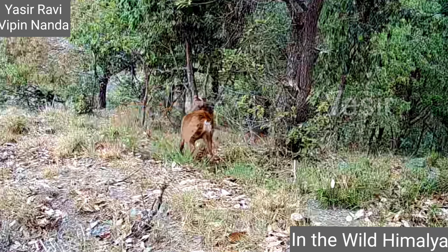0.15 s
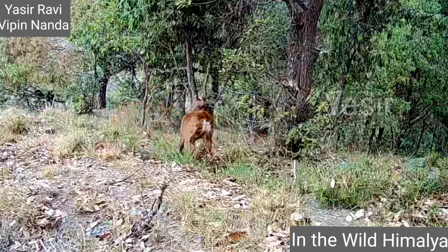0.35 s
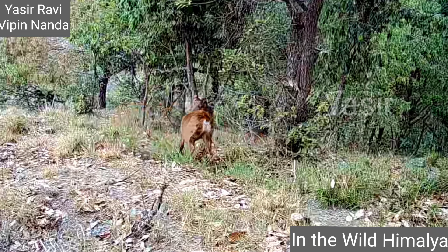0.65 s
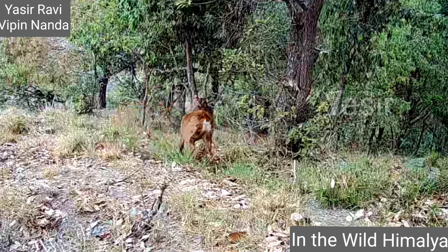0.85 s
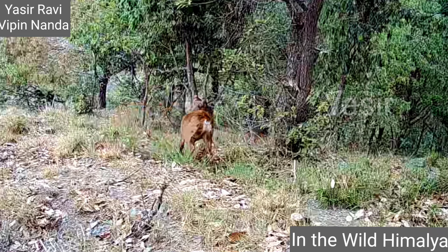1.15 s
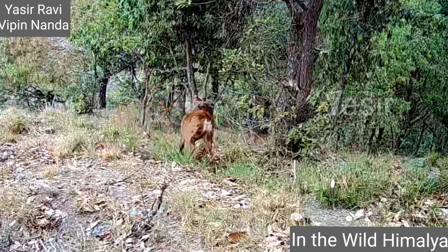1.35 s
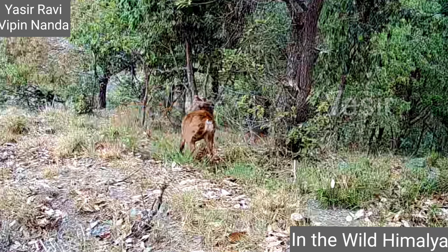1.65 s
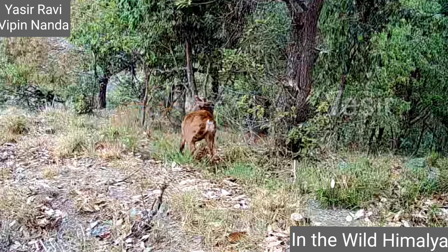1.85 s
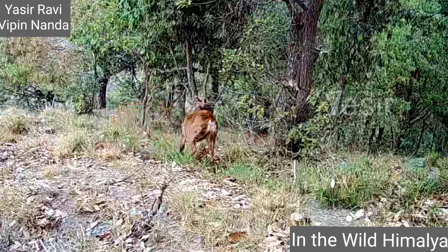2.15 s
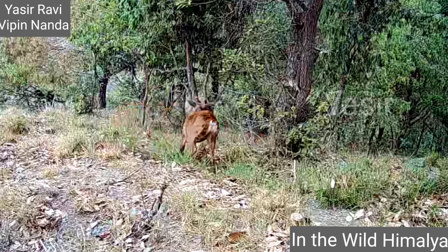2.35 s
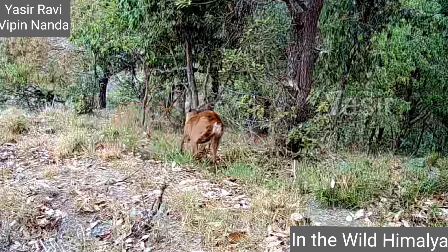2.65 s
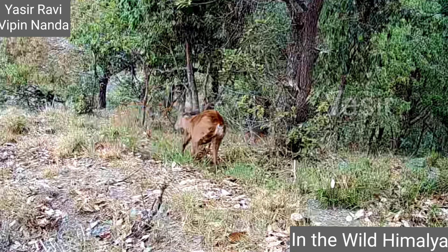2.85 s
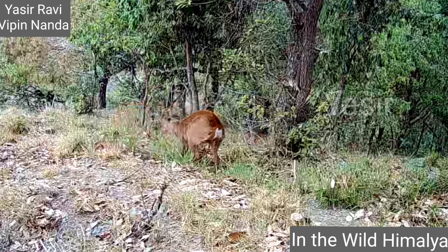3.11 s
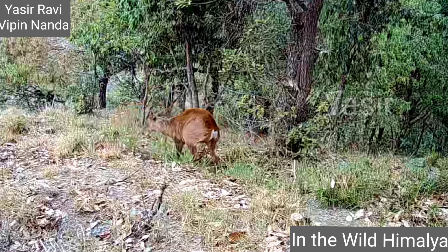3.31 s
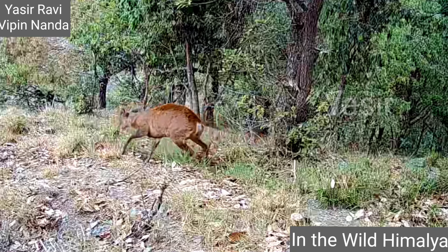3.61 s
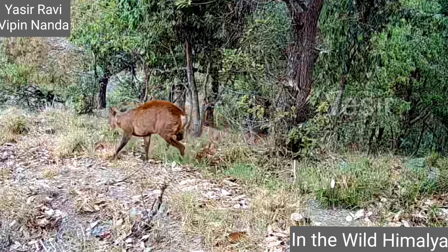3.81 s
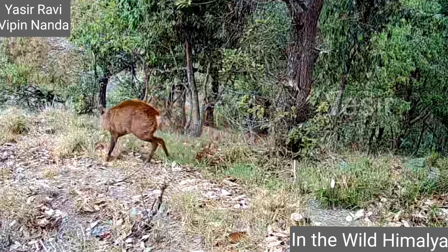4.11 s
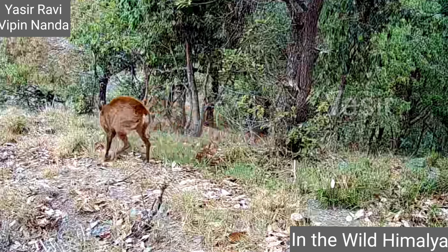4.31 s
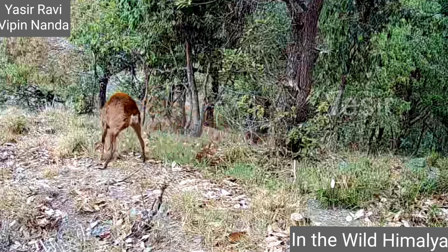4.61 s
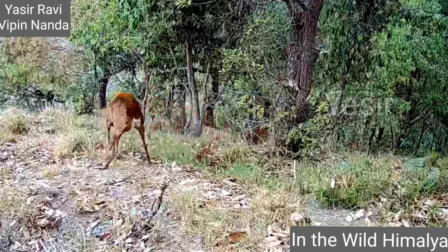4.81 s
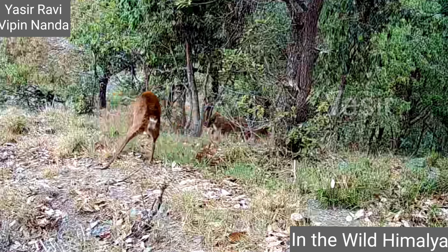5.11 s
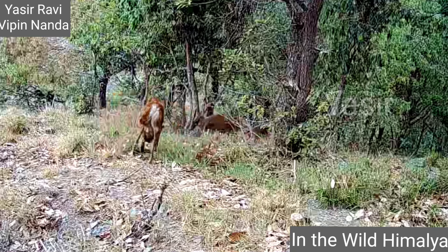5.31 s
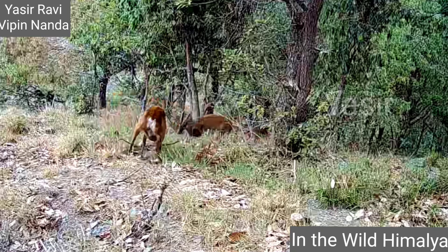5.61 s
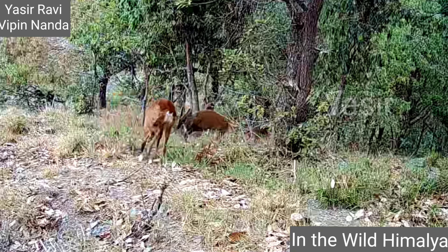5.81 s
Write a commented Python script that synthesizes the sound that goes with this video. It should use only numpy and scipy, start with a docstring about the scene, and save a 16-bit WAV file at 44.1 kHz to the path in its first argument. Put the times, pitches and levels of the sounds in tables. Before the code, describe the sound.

Two deer call briefly from nearby, their piercing voices lightly echoing off trees. First comes a falling clear squeal, then a raspy arched one. Leaves tick and rustle gently around the middle, thin far squeals and chirps fade out, and a stronger clear call sounds. Near the end a hoarse call is closely followed by a clear one. Airy foliage hiss runs throughout, captured outdoors in stereo with thin low end.

```python
"""Two deer squeal in a quiet forest, over a soft hiss that eases a little in the first four seconds.
Faint squeals (bare harmonics) and chirps (gliding sines) among the trees and ticking leaves (noise bursts) open it.
A clear, mostly falling voice calls first, then a hoarse, quavering arch: both are harmonics shaped by a throat.
At about 2.5 s the grainy leaf rustle swells as the deer turns to walk off; the distant calls end before 3.5 s.
The clear deer calls again, then near the end the hoarse one and the clear one follow each other closely."""
import sys
import numpy as np
from scipy import signal
from scipy.fft import rfft, irfft, next_fast_len
from scipy.io import wavfile
from scipy.ndimage import map_coordinates

SR = 44100
rng = np.random.default_rng(int(sys.argv[2]) if len(sys.argv) > 2 else 0)


def inscribe(sig):
    """Save sig as 16-bit PCM at rate SR to the path in sys.argv[1].

    A 1-D sig is mono; a 2-D sig holds one channel per row.
    Samples are clipped to [-1, 1] before scaling.
    """
    pcm = np.round(np.clip(np.atleast_2d(sig).T, -1, 1) * 32767)
    wavfile.write(sys.argv[1], SR, pcm.astype(np.int16))


N = 262836
TIME = np.arange(N) / SR
TOP_HZ = 15800  # upper band limit

# Held part of each clear call: (time [s], pitch [Hz], level before harmonic balance and echoes [dB])
CLEAR_CALLS = [
    [(0.35, 1236, -37), (0.368, 1238, -37), (0.402, 1211, -42.5), (0.442, 1176, -38), (0.536, 1167, -38.5),
     (0.645, 1117, -45.5)],
    [(3.282, 1241, -30), (3.318, 1230, -25), (3.344, 1208, -30.5), (3.428, 1174, -28), (3.516, 1158, -32.5),
     (3.585, 1117, -38.5)],
    [(5.548, 1286, -31.5), (5.622, 1302, -26), (5.742, 1250, -28), (5.774, 1218, -27.5),
     (5.846, 1180, -30.5), (5.868, 1163, -34.5)],
]
# Held part of each hoarse call: (time [s], pitch [Hz], level before harmonic balance and echoes [dB])
HOARSE_CALLS = [
    [(1.168, 1230, -37), (1.21, 1303, -31.5), (1.346, 1334, -31), (1.45, 1309, -31), (1.634, 1146, -43.5),
     (1.65, 1164, -41)],
    [(5.068, 1213, -36.5), (5.1, 1273, -32), (5.22, 1321, -28), (5.318, 1301, -29.5), (5.464, 1215, -37),
     (5.5, 1161, -37)],
]
# Voicing of each call: (upward scoop [s], final drop [s], drop [share of pitch], treble slope [dB per octave],
# 2nd, 3rd, 4th and upper harmonics [dB against the call's level])
CLEAR_VOICING = [(.052, 0.032, 0.29, -5.5, -0.5, -10.5, -1, -13.5),
                 (.048, 0.033, .15, 2, -7, -9.5, -5.5, -11), (.048, 0.019, .176, 2.5, -6, -8.5, -6, -13.5)]
HOARSE_VOICING = [(.052, .023, 0.084, 0, -4.5, -11.5, -13, -4.5),
                  (.052, .068, 0.059, 0.0057, -6, -12, -12, -5)]
# Gain as the pitch is pushed up: (2nd, 3rd, 4th, upper harmonics [dB per semitone])
CLEAR_PUSH = [(1.5, -0.17, -3.5, -3), (0, -1.4, 1.5, -1), (0.5, -2, 4, -1.5)]
HOARSE_PUSH = [(1, -5, 0.5, 0.63), (0.3, -8, 2.6, 0.37)]
# Upper resonances of the two throats: (frequency [Hz], relative level [dB])
CLEAR_THROAT = [(5600, -2.5), (6300, 1.5), (7200, -13), (8100, 4.5), (8900, -1.5), (9800, -20.5),
                (10600, -12), (11200, -20), (11800, -16.5), (13000, -14), (14200, -25), (15700, -30.5)]
HOARSE_THROAT = [(5600, -5), (6600, -5), (7400, -1), (7950, 4), (8600, -14), (9400, -22.5), (10600, -22),
                 (12000, -20), (13300, -28), (15700, -46)]
# Strain in each hoarse call: (period doubling [dB], rasp [dB])
HOARSE_STRAIN = [(-21, -27), (-22.5, -33)]
# Colour of the lines halfway between the harmonics: (frequency [Hz], relative level [dB])
HALFWAY_COLOUR = [(1900, -22.5), (2500, 7.5), (3200, -1), (4600, -6), (6000, 2.5), (7300, -2), (8600, -6),
                  (10000, -6), (11200, -18.5), (12500, -11), (15500, -27)]
# Spells of harsh noise inside the calls: (time [s], length [s], centre [Hz], level before fades and echoes [dB])
HARSH_BREAKS = [(1.368, 0.077, 3540, -50.5), (1.563, 0.18, 3140, -55), (5.424, 0.18, 3220, -50.5),
                (5.683, 0.15, 3130, -54.5)]
# Distant squeals: (time [s], length [s], top pitch [Hz], arch depth [twice the share of pitch lost at each end],
# level before fades and echoes [dB])
FAR_CALLS = [(0.058, 0.13, 1471, 0.41, -60), (0.897, 0.19, 1563, 0.25, -60.5),
             (1.773, 0.12, 1282, 0.51, -59.5), (3.175, 0.021, 1300, 0.11, -61.5)]
# Colour of the distant voices: (frequency [Hz], relative level [dB])
FAR_THROAT = [(1500, -13.5), (3000, -3.5), (3700, -1), (4500, 3.5), (6200, -17.5), (8000, -38)]
# Short chirps: (time [s], length [s], start pitch [Hz], end pitch [Hz], level before fades and echoes [dB])
CHIRPS = [(0.108, 0.057, 2722, 2507, -51.5), (1.415, 0.039, 2800, 3130, -52.5),
          (1.605, 0.032, 2864, 2626, -48), (2.01, 0.037, 3300, 3440, -68),
          (3.152, 0.015, 2660, 3070, -55.5), (3.168, 0.055, 2583, 2395, -52.5),
          (3.202, 0.034, 2584, 2663, -56), (3.361, 0.015, 2690, 2710, -50)]
# Dry leaves under hooves: (time [s], relative level of the burst [dB])
LEAF_TICKS = [(0.1474, -48.5), (2.2878, -51), (2.4136, -50), (2.624, -50.5), (2.744, -52.5),
              (2.8125, -53.5), (2.952, -54), (3.692, -49.5), (4.3384, -59.5)]
# Colour of the leaf noise: (frequency [Hz], gain [dB])
LEAF_COLOUR = [(1000, -12), (2200, 15), (4500, -2), (9000, 1.5), (15000, -12.5)]
# Spectrum of the hiss: (frequency [Hz], relative level [dB per Hz])
AIR_COLOUR = [(25, -49), (300, -44), (500, -34), (630, -26.5), (800, -20.5), (1000, -14.5), (1400, -7),
              (2000, 0.5), (2600, -4), (3500, -7.5), (5000, -13), (8000, -15), (12000, -17), (15500, -18)]
# Likeness of the hiss left and right: (frequency [Hz], correlation [0 to 1])
AIR_LIKENESS = [(300, .4), (1000, 0.76), (2000, 0.64), (4000, 0.13), (7000, 0.91), (14000, 1)]
# Ring of the wood beyond: (frequency [Hz], time to fall 60 dB [s])
FOREST_RING = [(1000, 0.35), (4000, 0.8), (8000, 0.53), (15000, 0.13)]
# Colour of the echoes: (frequency [Hz], gain [dB])
ECHO_COLOUR = [(1500, -1.5), (3000, -0.5), (4700, 2), (6000, 5), (8000, 0.5), (15000, -6.5)]


def squeal(rows, voicing, push_db, throat, quaver, quaver_hz, jitter, half_db, first_db,
           rasp_db, onset_rasp_db, onset_db, release_db, flicker_db):
    """One call: the folds start harshly, scoop up to pitch, hold, then slacken."""
    scoop_s, drop_s, drop, treble_db, *balance_db = voicing
    start, end = rows[0][0], rows[-1][0]
    span, t = during(start - scoop_s, end + drop_s)
    held, level_db = curves(rows, t)

    # all harmonics follow the level; their balance tips with the pitch
    semitones = 12 * np.log2(held / held.mean())
    second, third, fourth, upper = [
        level_db + db + push * semitones for db, push in zip(balance_db, push_db)]

    # rise goes 1 to 0 over the scoop, fall 0 to 1 over the drop
    rise = np.clip((start - t) / scoop_s, 0, 1)
    fall = np.clip((t - end) / drop_s, 0, 1)
    bend = (1 - 0.52 * rise ** 1.7) * (1 - drop * fall ** 2.5)
    quavering = quaver * unit(np.gradient(wobble(quaver_hz, t)))
    pitch = held * bend * (1 + quavering + jitter * wobble(900, t))
    phase = 2 * np.pi * np.cumsum(pitch) / SR

    # the throat keeps its shape while the bending harmonics slide through it
    orders = np.arange(5, 15)[:, None]
    high = amp(along(throat, orders * held) + treble_db * np.log2(orders))
    high_db = 20 * np.log10(high / np.linalg.norm(high, axis=0))
    shape = np.vstack([second + first_db, second, third, fourth, upper + high_db])

    # harshest at the onset, with some of it back in the final drop
    rasp = amp(rasp_db) + amp(onset_rasp_db) * np.maximum(rise, fall / 2) ** 2
    voice = np.zeros(len(t))
    for k in range(1, 20):
        size = amp(map_coordinates(shape, [k * bend - 1, np.arange(len(t))], order=1, mode="nearest"))
        # higher harmonics waver more in strength
        flicker = flicker_db * np.sqrt(k / 4) * (wobble(69.9, t) + wobble(16.93, t))
        line = amp(flicker) * np.sin(k * phase)
        # turbulence spreads a skirt of noise round each harmonic
        skirt = wobble(800, t) * np.sin(k * phase) + wobble(800, t) * np.cos(k * phase)
        # unequal alternate cycles put lines halfway between the harmonics
        between_db = upper + half_db + along(HALFWAY_COLOUR, (k + .5) * pitch) + 1.2 * wobble(50, t)
        halfway = amp(between_db) * np.sin((k + .5) * phase)
        voice += (size * (line + rasp * skirt) + halfway) * (k * pitch < TOP_HZ)

    edges = amp(onset_db * rise + release_db * fall) * np.sqrt(1 - np.maximum(rise, fall) ** 6)
    out = np.zeros(N)
    out[span] = np.sqrt(2) * voice * edges
    return out


def clear_deer():
    """A pure, piercing voice: little quaver, and only faint lines between its harmonics."""
    return sum(
        squeal(rows, voicing, push_db, CLEAR_THROAT, quaver=0.0011, quaver_hz=50.6, jitter=0.0035,
               half_db=-37, first_db=-42.5, rasp_db=-45, onset_rasp_db=-4,
               onset_db=-13, release_db=-6.5, flicker_db=1.5)
        for rows, voicing, push_db in zip(CLEAR_CALLS, CLEAR_VOICING, CLEAR_PUSH))


def hoarse_deer():
    """A strained voice that quavers and doubles its period."""
    return sum(
        squeal(rows, voicing, push_db, HOARSE_THROAT, quaver=0.0049, quaver_hz=149.64, jitter=0.003,
               half_db=half_db, first_db=-36.5, rasp_db=rasp_db, onset_rasp_db=-1,
               onset_db=-11.5, release_db=-4.0, flicker_db=1.13)
        for rows, voicing, push_db, (half_db, rasp_db)
        in zip(HOARSE_CALLS, HOARSE_VOICING, HOARSE_PUSH, HOARSE_STRAIN))


def breaks(width_hz=700, flutter_db=4):
    """The voice turns briefly harsh: fluttering bands of noise between its low harmonics."""
    out = np.zeros(N)
    for s, length, centre_hz, db in HARSH_BREAKS:
        span, t = during(s, s + length)
        band = (wobble(width_hz, t) + 1j * wobble(width_hz, t)) * np.exp(2j * np.pi * centre_hz * t)
        harsh = unit(band.real * amp(flutter_db * wobble(120, t)))
        out[span] += amp(db) * harsh * np.sin(np.pi * (t - s) / length)
    return out


def far_calls():
    """Thin, ragged squeals from deeper in the wood: harmonics 2 to 5 on an arched pitch."""
    out = np.zeros(N)
    for s, length, top_hz, arch, db in FAR_CALLS:
        span, t = during(s, s + length)
        u = np.clip((t - s) / length, 0, 1)
        pitch = top_hz * (1 - 2 * arch * (u - .5) ** 2 + .018 * wobble(900, t))
        phase = 2 * np.pi * np.cumsum(pitch) / SR
        voice = sum(amp(along(FAR_THROAT, k * pitch) + 3.6 * wobble(88.7, t)) * np.sin(k * phase)
                    for k in range(2, 6))
        out[span] += amp(db) * unit(voice) * np.abs(np.sin(np.pi * u)) ** .5
    return out


def chirps():
    """Brief, unsteady whistles: single sines gliding between two pitches."""
    out = np.zeros(N)
    for s, length, from_hz, to_hz, db in CHIRPS:
        span, t = during(s, s + length)
        u = (t - s) / length
        pitch = (from_hz + (to_hz - from_hz) * u) * (1 + 0.026 * wobble(300, t))
        whistle = np.sqrt(2) * np.sin(2 * np.pi * np.cumsum(pitch) / SR)
        out[span] += amp(db) * np.sin(np.pi * u) * whistle
    return out


def leaves(t60=0.021, level_db=-3, crackle_db=8):
    """Dry leaves snap in short, decaying noise bursts over a faint, grainy rustle."""
    # the rustle swells as the deer turns to walk off; levels are ahead of the leaf colour
    quiet_db, turn_db, turn_s, turn_width_s = -83, 12.5, 2.55, .5
    rustle_db = quiet_db + turn_db * np.exp(-((TIME - turn_s) / turn_width_s) ** 2)
    grains = amp(crackle_db * np.tanh(wobble(150, TIME))) * rng.standard_normal(N)
    out = unit(grains) * amp(rustle_db)
    for s, db in LEAF_TICKS:
        span, t = during(s, s + .08)
        burst_db = db + level_db - 60 * (t - s) / t60 + 4.4 * wobble(530, t)
        out[span] += amp(burst_db) * rng.standard_normal(len(t))
    return filtered(out, lambda hz: amp(along(LEAF_COLOUR, hz)))


def air():
    """Soft hiss of foliage: coloured mid and side noise, widest around 4 kHz."""
    def colour(hz):
        # this angle between mid and side gives the wanted left-right correlation
        turn = np.arccos(np.clip(along(AIR_LIKENESS, hz), -1, 1)) / 2
        return amp(along(AIR_COLOUR, hz)) * [np.cos(turn), np.sin(turn)]

    mid, side = filtered(rng.standard_normal((2, N)), colour)
    # the hiss eases a little at first, then holds
    steady_db, early_db, settle_s = -61.5, 3, 4
    level_db = steady_db + early_db * np.maximum(1 - TIME / settle_s, 0)
    return unit(np.array([mid + side, mid - side])) * amp(level_db + 0.37 * wobble(7.8, TIME))


def forest(x, near_db, far_db, near_t60=0.14):
    """Ground and near trunks scatter the sound at once; the wood beyond rings on faintly."""
    hz, t, z = signal.stft(rng.standard_normal((2, SR)), SR, nperseg=256)
    ring = amp(-60 * t / along(FOREST_RING, hz)[:, None])
    far = signal.istft(z * ring, SR, nperseg=256)[1][:, :SR]
    near = rng.standard_normal((2, SR)) * amp(-60 * TIME[:SR] / near_t60)
    echo = (amp(near_db) * unit(near) + amp(far_db) * unit(far)) / np.sqrt(SR)
    # each side gets some of the other, so the two are partly alike
    echo = echo + 0.37 * echo[::-1]
    echoes = signal.fftconvolve(x[None], echo, axes=1)[:, :N]
    return x + filtered(echoes, lambda hz: amp(along(ECHO_COLOUR, hz)))


def placed(x, balance_db):
    """Lean a stereo pair to the left (+) or right (-)."""
    return x * amp([[balance_db / 2], [-balance_db / 2]])


def amp(db):
    """Decibels to gain."""
    return 10 ** (np.asarray(db) / 20)


def unit(x):
    """Scale to rms 1."""
    return x / np.sqrt(np.mean(x ** 2) + 1e-20)


def along(points, hz):
    """Read (frequency [Hz], value) points on a log frequency axis."""
    f, v = np.transpose(points)
    return np.interp(np.log(hz + 1), np.log(f + 1), v)


def curves(rows, t):
    """Each column after the time, read at the times t."""
    s, *cols = np.transpose(rows)
    return [np.interp(t, s, c) for c in cols]


def wobble(rate, t):
    """A smooth random curve, rate knots a second."""
    return map_coordinates(rng.standard_normal(8192), [(t - t[0]) * rate], mode="wrap")


def filtered(x, response):
    """Shape the spectrum of x by a response of frequency."""
    m = next_fast_len(N + SR // 2)
    return irfft(rfft(x, m) * response(np.fft.rfftfreq(m, 1 / SR)), m)[..., :N]


def during(start, end):
    """The samples between two times, and their times."""
    span = (TIME >= start) & (TIME < end)
    return span, TIME[span]


def scene():
    """The two deer nearby, small sounds behind them, and the air."""
    clear = forest(clear_deer(), near_db=-8.5, far_db=-22.0)
    hoarse = forest(hoarse_deer() + breaks(), near_db=-8.0, far_db=-23.0)
    distant = forest(far_calls() + chirps(), near_db=1.0, far_db=-7.0)
    voices = hoarse + placed(clear, balance_db=-2.1)
    return voices + placed(distant + leaves() + air(), balance_db=-0.85)


def record(dry):
    """The microphone thins out everything below 900 Hz and keeps nothing above its band limit."""
    return filtered(dry, lambda hz: (hz < TOP_HZ) * amp(along([(400, -23.5), (900, 0.0)], hz)))


dry = scene()
out = record(dry)
inscribe(out)
```